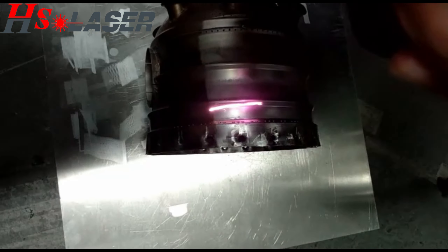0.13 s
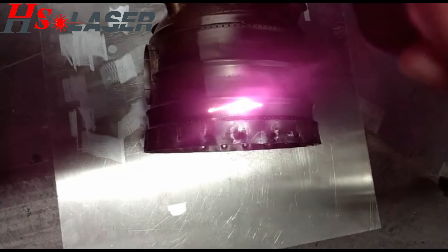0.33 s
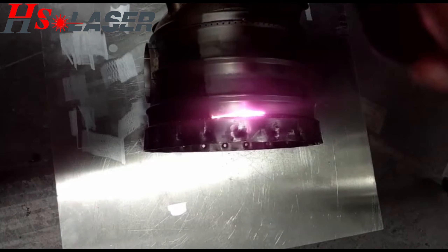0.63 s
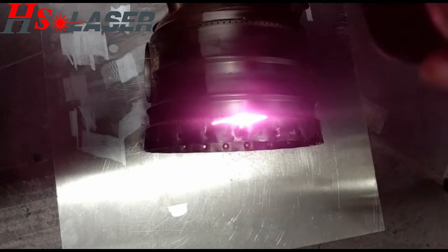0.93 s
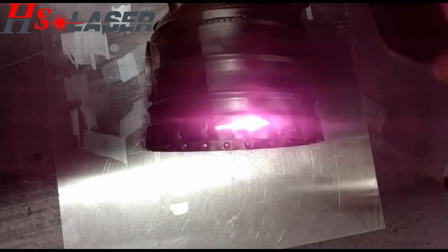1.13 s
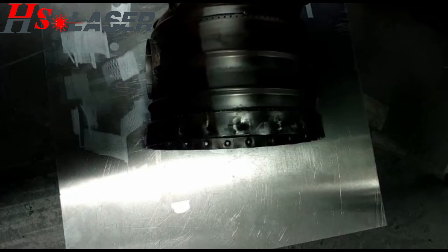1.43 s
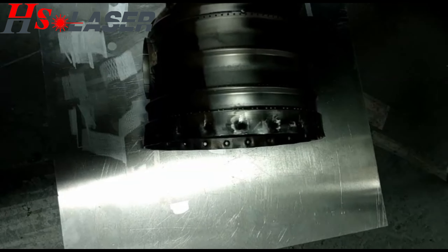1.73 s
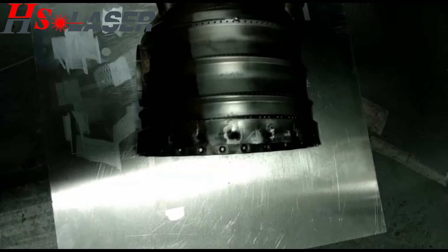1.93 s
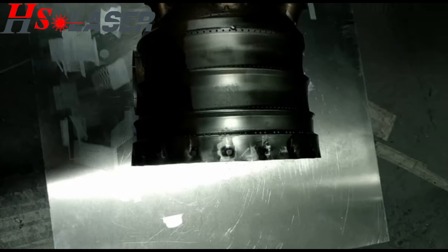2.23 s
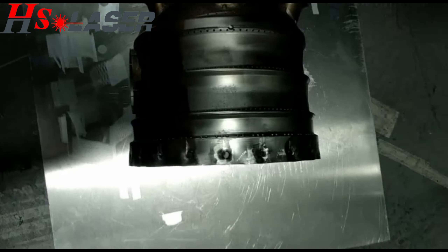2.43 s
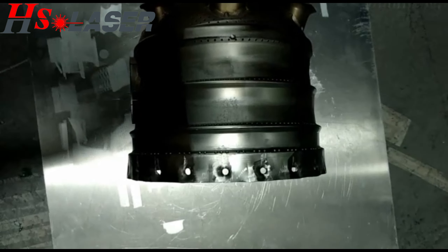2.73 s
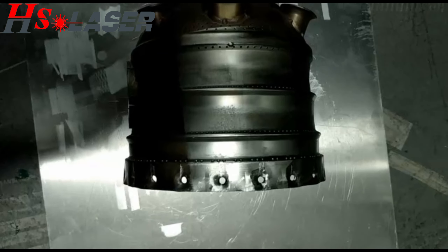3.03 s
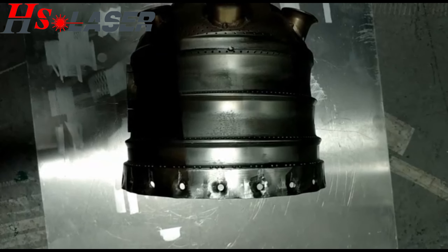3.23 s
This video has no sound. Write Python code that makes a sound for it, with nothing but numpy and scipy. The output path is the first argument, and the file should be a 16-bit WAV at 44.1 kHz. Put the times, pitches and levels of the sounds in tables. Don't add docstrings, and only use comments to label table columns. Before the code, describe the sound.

A pulsed laser cleaner buzzes harshly against a hollow metal part, swelling and shifting in roughness, then cuts off abruptly. Extractor fan roar and mains hum continue in a workshop, with small metallic ticks, close microphone.

```python
import sys
import numpy as np
from scipy import signal
from scipy.fft import rfft, irfft, next_fast_len
from scipy.io import wavfile
from scipy.ndimage import uniform_filter1d

SR = 44100
rng = np.random.default_rng(int(sys.argv[2]) if len(sys.argv) > 2 else 0)


def how_loud(loudness_db):
    steps = np.asarray(loudness_db, float) / 20
    return 10 ** steps


def file_out(sig):
    cols = np.atleast_2d(sig).T
    lim = np.clip(cols, -1, 1)
    pcm = np.round(lim * 32767).astype(np.int16)
    wavfile.write(sys.argv[1], SR, pcm)


N = 148617

# frequency in Hz, density in dB per Hz.
FAN_COLOUR = [(35, -65), (80, -25), (130, -22), (250, -6), (550, -14), (1300, -18), (2200, -25.5),
              (3200, -36.5), (6000, -65)]
# frequency in Hz, width in Hz, level in dB.
DUCT_MODES = [(165.8, 22, -11), (288.2, 36, -4.5), (295.1, 14.8, -3), (310.3, 13, -1.5), (405.2, 19, -3.5),
              (426.4, 33.4, -3.5), (643.8, 25, -12), (996, 15, -17)]
# frequency in Hz, rms level in dB.
HUM_LINES = [(100, -58.5), (200, -45), (969, -59), (1933, -65), (3865, -74), (5798, -71), (7685, -66),
             (8780, -73)]
# frequency in Hz, density in dB per Hz.
HISS_COLOUR = [(1500, -16), (2500, -3.5), (3600, -10), (4600, -4), (5500, -5.5), (7000, -9), (8900, -3.5),
               (9800, -8.5), (11000, 1.5)]
# time in seconds, level in dB.
HISS_RIDE = [
    (0, -41),
    (1.5, -49),
    (1.62, -54),
    (1.8, -53),
    (2.0, -49),
    (2.2, -47.5),
    (2.5, -48.5),
    (2.7, -47.5),
    (3.1, -45),
    (3.37, -48),
]
# frequency in Hz, side level relative to mid in dB.
AIR_WIDTH = [(40, -14), (150, -24), (350, -27), (700, -21), (1500, -21), (2600, -28), (4000, -36)]
# start in seconds, level in dB, pitch in Hz, T60 in seconds.
METAL_TICKS = [(.012, -19, 2096, 0.14), (1.442, -26.5, 5630, 0.14), (2.093, -42, 7700, .03),
               (2.394, -33, 8940, 0.034), (2.465, -33, 9200, .03), (2.541, -25.5, 9300, 0.033),
               (2.579, -44, 9700, .03), (2.608, -40, 8440, .03), (2.755, -44, 1350, 0.051),
               (2.758, -31, 9150, 0.036), (2.85, -32, 4500, .05), (2.85, -29, 9670, 0.04),
               (2.977, -27.5, 8720, 0.055), (2.981, -16, 1507, .12), (2.99, -26, 1940, 0.086),
               (3.0, -41, 4540, .06), (3.16, -17, 8710, 0.03), (3.16, -23.5, 3700, 0.03),
               (3.16, -23.5, 2240, 0.04)]
# frequency in Hz, level in dB.
SCANNER_WHINE = [(2500, -57), (2900, -59), (3300, -62), (3900, -58), (4100, -58), (4500, -55.5),
                 (5000, -60), (5700, -57), (6100, -62), (7900, -57)]
# frequency in Hz, level in dB.
CRACK_COLOUR = [(250, -30), (700, 1), (2200, 0), (3200, -2), (6000, -1), (8200, 3), (9800, 0), (11200, -30)]
# frequency in Hz, level in dB.
RING_COLOUR = [(300, -61), (1200, -6), (2250, -12.5), (2700, -15.5), (5300, -8.5), (6600, -10), (8400, 1),
               (9900, -10)]
# delay in seconds, spread in seconds, level in dB.
RIB_ECHOES = [
    (.0005, .0003, -5),
    (.0023, .0006, 0),
    (.0046, .0005, -5),
    (.008, .002, -13),
]
# frequency in Hz, level in dB, T60 in seconds.
SHELL_MODES = [(2210, -11, .03), (2900, -16, .04), (3290, -14, .03), (4100, -17, .05), (4500, -16, .05),
               (5050, -14, .03), (5650, -11, .05), (7280, -11, .04), (7880, -9, .04), (8310, -10, .04),
               (8780, -11, .04), (9200, -12, .04), (9700, -15, .04)]
# time in seconds, first crack in dB, second crack in dB, ringing in dB.
DIRT_A = [(0.0, -30, -28, -40), (0.09, -21, -36, -36), (0.24, -35, -31, -44), (0.36, -32, -29, -41),
          (0.39, -22, -23, -36), (0.45, -20, -15, -33), (0.51, -9, -17, -26), (0.54, -10, -19, -27),
          (0.57, -16, -23, -30), (0.6, -14, -21, -26), (0.63, -15, -21, -28), (0.66, -4, -8, -26),
          (0.69, -17, -20, -27), (0.72, -17, -15, -30), (0.78, -26, -22, -41), (0.81, -15, -13, -27),
          (0.84, -10, -15, -26), (0.87, -11, -16, -27), (0.96, -25, -26, -44), (1.02, -23, -26, -38),
          (1.08, -30, -34, -44), (1.11, -24, -27, -36), (1.17, -28, -25, -37), (1.2, -20, -18, -30),
          (1.23, -35, -25, -33), (1.29, -42, -34, -47), (1.32, -29, -13, -27), (1.35, -31, -20, -31),
          (1.41, -28, -14, -36), (1.44, -15, -25, -31)]
DIRT_B = [(0.01, -33, -33, -50), (0.07, -32, -35, -38), (0.1, -37, -25, -40), (0.22, -30, -22, -50),
          (0.25, -37, -19, -37), (0.31, -45, -38, -50), (0.37, -43, -30, -50), (0.4, -36, -22, -50),
          (0.43, -27, -17, -36), (0.46, -31, -19, -50), (0.49, -32, -27, -50), (0.55, -24, -18, -50),
          (0.58, -26, -16, -35), (0.61, -26, -15, -31), (0.64, -20, -19, -44), (0.67, -26, -20, -40),
          (0.76, -31, -27, -50), (0.79, -26, -31, -43), (0.82, -17, -22, -31), (0.85, -16, -21, -31),
          (0.88, -25, -26, -36), (0.94, -33, -24, -40), (1.03, -37, -34, -43), (1.12, -31, -26, -41),
          (1.18, -19, -20, -30), (1.24, -35, -32, -46), (1.3, -35, -23, -38), (1.33, -16, -11, -23),
          (1.39, -33, -19, -35), (1.42, -9, -15, -21)]
DIRT_C = [(0.02, -18, -20, -37), (0.08, -20, -25, -35), (0.17, -14, -20, -29), (0.2, -10, -12, -27),
          (0.26, -13, -17, -27), (0.29, -29, -22, -40), (0.32, -33, -14, -33), (0.41, -28, -12, -27),
          (0.5, -23, -12, -28), (0.53, -25, -12, -25), (0.56, -29, -17, -25), (0.59, -28, -11, -27),
          (0.62, -24, -14, -34), (0.65, -27, -9, -33), (0.68, -33, -15, -36), (0.71, -36, -19, -45),
          (0.77, -39, -25, -50), (0.83, -28, -25, -50), (0.86, -37, -15, -41), (0.89, -34, -23, -50),
          (0.92, -34, -21, -44), (0.95, -37, -28, -50), (1.07, -34, -35, -41), (1.19, -36, -27, -50),
          (1.22, -43, -24, -37), (1.25, -37, -23, -36), (1.31, -35, -26, -50), (1.34, -29, -31, -35),
          (1.4, -36, -20, -38), (1.43, -20, -14, -27)]
# frequency in Hz, gain in dB.
MIC_RESPONSE = [(20, -14), (90, -8), (140, 0), (9800, 0), (10400, -12), (11000, -30), (12000, -50)]

SWEEP_HZ, FIRST_S, TWIN_S = 100.0057, .00082, .00053
STOP_S = 1.445
CRACK_DB, SCATTER_DB, REBOUND = 0., .8, .5
RING_DB, SHELL_DB = 22, -22.5
SIZZLE_DB, SIZZLE_S = -7., .003
ROOM_DB, ROOM_T60_S = -10.5, 0.25
FAN_DB, DUCT_DB = -37.5, -34
TICK_RISE_S = .004
LASER_SIDE_DB, RIGHT_DB = -19., .5
KEEP_SIDE_DB, TOP_MUTE_HZ, TOP_MUTE_DB = -20., 10150, -79.


def level(x, db):
    return x * how_loud(db) / np.sqrt(np.mean(x ** 2))


def colour(x, points):
    point_hz, point_db = np.array(points, float).T
    n = next_fast_len(x.shape[-1], real=True)
    hz = np.maximum(np.arange(n // 2 + 1) * SR / n, 1)
    gain = how_loud(np.interp(np.log(hz), np.log(point_hz), point_db))
    return irfft(rfft(x, n) * gain, n)[..., :x.shape[-1]]


def band(x, hz, width):
    return signal.lfilter(*signal.iirpeak(hz, hz / width, SR), x)


def ring(hz, t60, size):
    t = np.arange(size) / SR
    return np.sin(2 * np.pi * hz * t) * np.exp(-np.log(1000) * t / t60)


def walk(rate):
    hold = int(SR / rate)
    steps = np.repeat(rng.standard_normal(N // 400), hold)[:N]
    return 1.85 * uniform_filter1d(uniform_filter1d(steps, hold), hold)


def train(times, sizes):
    out, at = np.zeros(N), times * SR
    for k in range(-4, 6):
        i = at.astype(int) + k
        share = np.sinc(i - at) * np.cos(np.pi * (i - at) / 12) ** 2
        np.add.at(out, np.maximum(i, 0), sizes * share)
    return out


def patchy(points, slow_db, quick_db, low_hz, per_octave, count):
    n = next_fast_len(N, real=True)
    spec = rfft(colour(rng.standard_normal(n), points))
    out, shared = 0, walk(3)
    octave = np.log2(np.maximum(np.arange(len(spec)), 1) * SR / n / low_hz)
    for k in range(count):
        shared = .8 * shared + .6 * walk(3)
        window = np.clip(1 - np.abs(per_octave * octave - k), 0, 1)
        part = irfft(spec * window, n)[:N]
        out = out + part * how_loud(slow_db * shared + quick_db * walk(22))
    return level(out, 0)


def fan():
    t = np.arange(N) / SR
    roar = patchy(FAN_COLOUR, slow_db=.7, quick_db=1.8, low_hz=60, per_octave=2, count=16) * how_loud(FAN_DB)
    duct = np.zeros(N)
    for hz, width, db in DUCT_MODES:
        mode = band(band(rng.standard_normal(N), hz, width), hz, 1.67 * width)
        duct += level(mode, db) * how_loud(2.5 * walk(8))
    hum = np.zeros(N)
    for k, (hz, db) in enumerate(HUM_LINES):
        hum += 2 ** .5 * how_loud(db + 0.5 * walk(1.2)) * np.sin(2 * np.pi * hz * t + k)
    hiss = patchy(HISS_COLOUR, slow_db=.2, quick_db=1.6, low_hz=1400, per_octave=10, count=31)
    hiss = hiss * how_loud(np.interp(t, *np.array(HISS_RIDE).T))
    return roar + level(duct, DUCT_DB) + hum + hiss


def room(x):
    t = np.arange(SR // 2) / SR
    tails = rng.standard_normal((2, len(t))) * np.exp(-np.log(1000) * t / ROOM_T60_S) * (t > .006)
    wet = [signal.fftconvolve(x, tail / np.sqrt(np.sum(tail ** 2)))[:N] for tail in tails]
    return np.array(wet) * how_loud(ROOM_DB)


def ticks():
    size = 8192
    out = np.zeros(N + size)
    rise = np.minimum(np.arange(size) / (SR * TICK_RISE_S), 1)
    for s, db, hz, t60 in METAL_TICKS:
        tone = ring(hz, t60, size)
        rough = rng.standard_normal(size) * tone
        rough = band(band(rough, hz, hz * .3), hz, hz * .3)
        start = int(s * SR)
        out[start:start + size] += how_loud(db) * (1.3 * rough + .15 * tone) * rise
    return out[:N]


def scanner():
    t = np.arange(N) / SR
    whine = sum(how_loud(db + 2.2 * walk(12)) * np.sin(2 * np.pi * hz * t) for hz, db in SCANNER_WHINE)
    return whine * np.clip((STOP_S - t) / 0.029, 0, 1)


def housing():
    t = np.arange(3000) / SR
    shape = sum(how_loud(db) * np.exp(-.5 * ((t - s) / spread) ** 2) for s, spread, db in RIB_ECHOES)
    echo = colour(shape * rng.standard_normal(len(t)), RING_COLOUR)
    modes = np.zeros(len(t))
    for hz, db, t60 in SHELL_MODES:
        loud, detune = rng.standard_normal(2)
        modes += how_loud(db + 3. * loud + SHELL_DB) * ring(hz * (1 + .006 * detune), t60, len(t))
    return echo / np.sqrt(np.sum(echo ** 2)) + modes


def crack():
    click = colour(np.roll(np.eye(1, 256)[0], 128), CRACK_COLOUR)
    click = REBOUND * np.roll(click, 4) - click
    return click / np.abs(click).max()


def laser():
    out, click = np.zeros(N), crack()
    sweep = np.arange(int(STOP_S * SWEEP_HZ) + 1)
    sizzle_shape = np.exp(-np.abs(np.arange(-800, 801)) / (SR * SIZZLE_S))
    for k, dirt in enumerate((DIRT_A, DIRT_B, DIRT_C)):
        when, first_db, second_db, ring_db = np.array(dirt, float).T
        s = sweep[k::3] / SWEEP_HZ
        first_s, second_s = s + FIRST_S, s + FIRST_S + TWIN_S
        luck = rng.standard_normal((2, len(s)))
        first = how_loud(np.interp(s, when, first_db) + SCATTER_DB * luck[0])
        second = how_loud(np.interp(s, when, second_db) + SCATTER_DB * luck[1])
        hits = train(first_s, first) + train(second_s, second)
        out += how_loud(CRACK_DB) * signal.fftconvolve(hits, click)[128:N + 128]

        push, both = how_loud(np.interp(s, when, ring_db)), np.hypot(first, second)
        rung = train(first_s, push * first / both) + train(second_s, push * second / both)
        for spot in range(7):
            share = np.cos(np.pi / 2 * np.clip(np.arange(N) / SR * 4 - spot, -1, 1))
            out += how_loud(RING_DB) * signal.fftconvolve(rung * share, housing())[:N]

        sizzle = signal.fftconvolve(train(second_s, push), sizzle_shape, "same")
        out += sizzle * level(colour(rng.standard_normal(N), RING_COLOUR), SIZZLE_DB)
    return out


def scene():
    beam = laser() + scanner()
    wet, air = room(beam), fan()
    air_side = colour(np.roll(air, N // 2), AIR_WIDTH)
    laser_side = how_loud(LASER_SIDE_DB + 3. * walk(25)) * (np.roll(beam, 90) + wet[1])
    ears = np.array([[1], [-1]])
    direct = beam * how_loud(-ears * RIGHT_DB / 2)
    return direct + wet[0] + air + ticks() + (air_side + laser_side) * ears


def band_limit(x):
    return signal.sosfilt(signal.butter(12, 11900, fs=SR, output="sos"), x)


def record(dry):
    x = colour(np.pad(dry, ((0, 0), (0, 4096))), MIC_RESPONSE)
    mid_side = np.array([x[0] + x[1], x[0] - x[1]]) / 2
    hz, _, z = signal.stft(mid_side, SR, nperseg=2048)
    edge = np.cumsum(np.minimum(np.arange(90) + 2, 14))
    edge = edge[edge < len(hz)] - edge[0]
    power = np.add.reduceat(np.abs(z) ** 2, edge, axis=1)
    power = np.repeat(power, np.diff(edge, append=len(hz)), axis=1)
    z[1] *= power[1] > power[0] * how_loud(2 * KEEP_SIDE_DB)
    z *= (power[0] > how_loud(2 * TOP_MUTE_DB)) | (hz[:, None] < TOP_MUTE_HZ)
    mid, side = signal.istft(z, SR)[1][:, :N]
    return band_limit(np.array([mid + side, mid - side]))


dry = scene()
out = record(dry)
file_out(out)
```